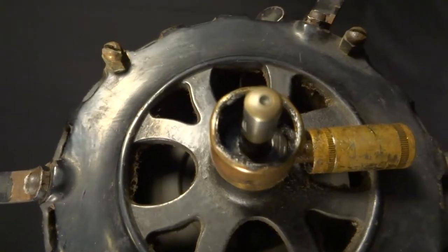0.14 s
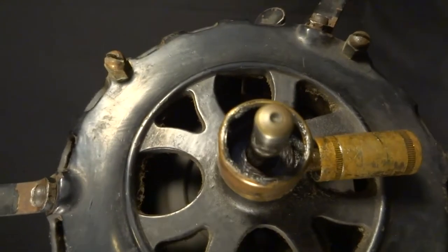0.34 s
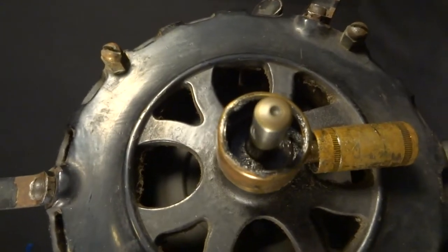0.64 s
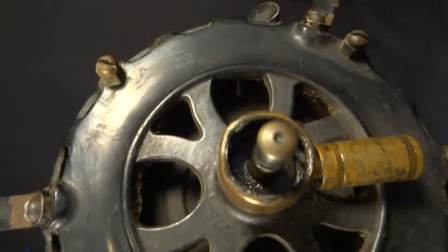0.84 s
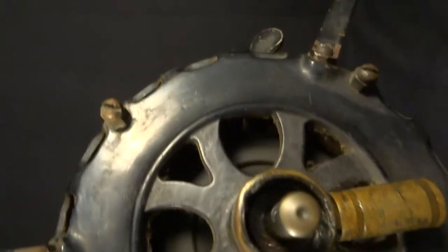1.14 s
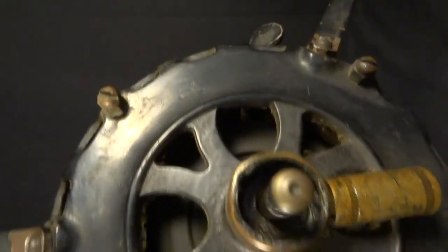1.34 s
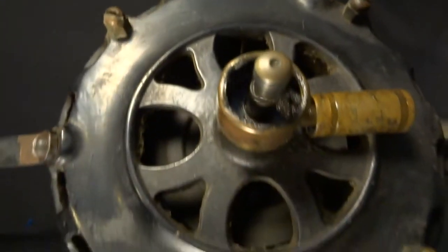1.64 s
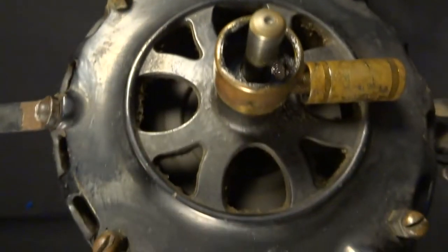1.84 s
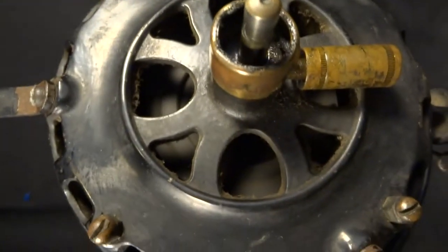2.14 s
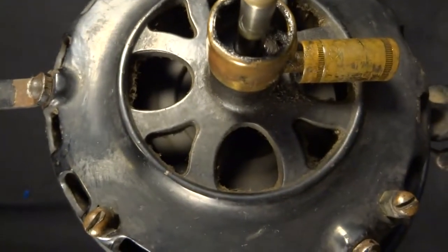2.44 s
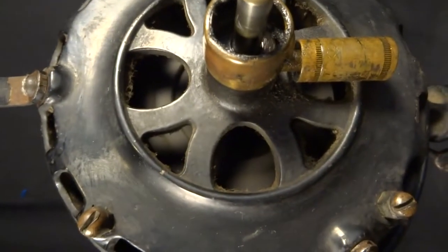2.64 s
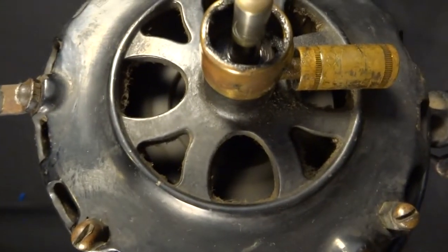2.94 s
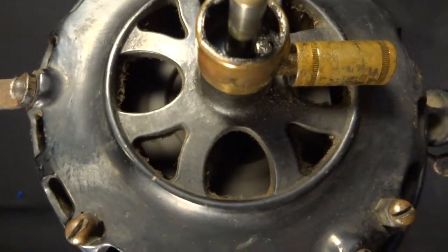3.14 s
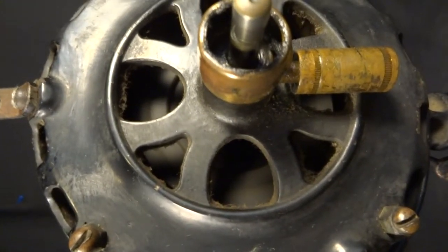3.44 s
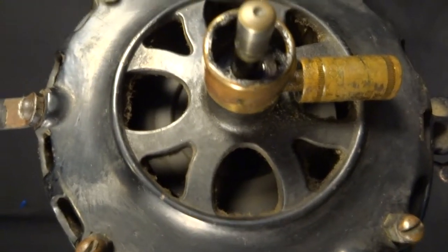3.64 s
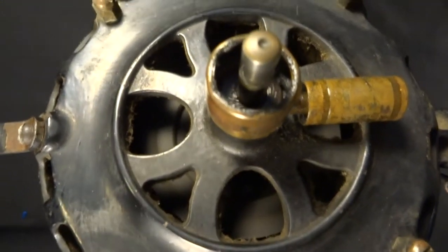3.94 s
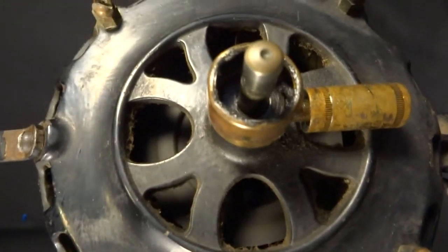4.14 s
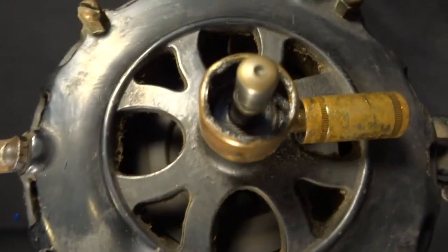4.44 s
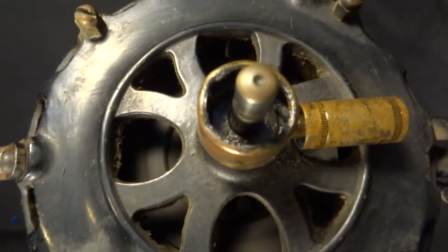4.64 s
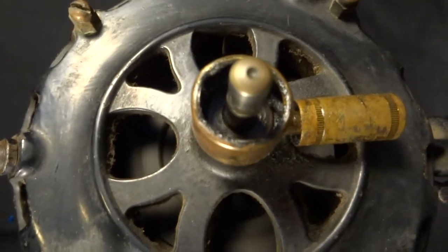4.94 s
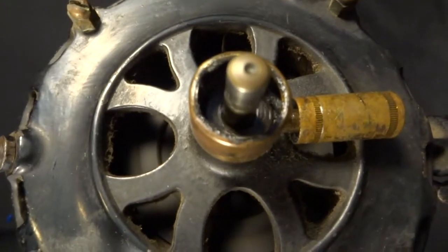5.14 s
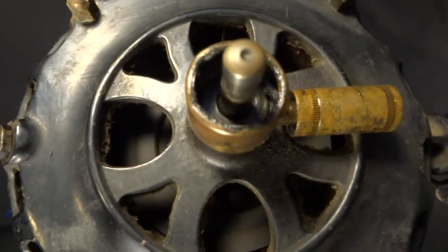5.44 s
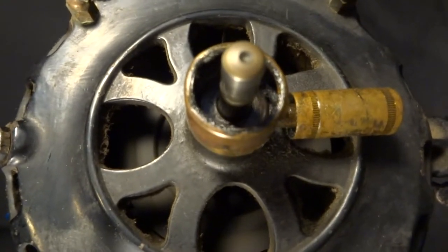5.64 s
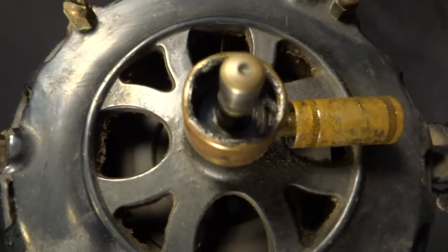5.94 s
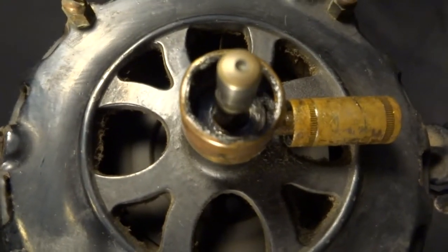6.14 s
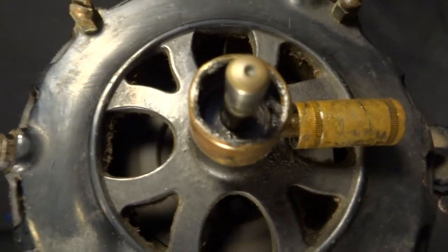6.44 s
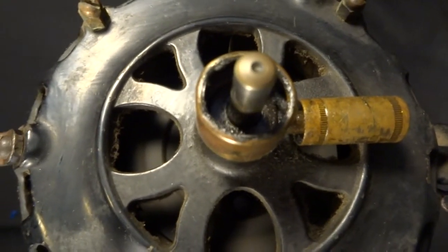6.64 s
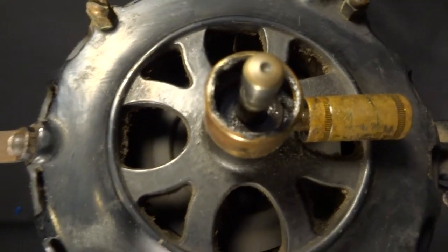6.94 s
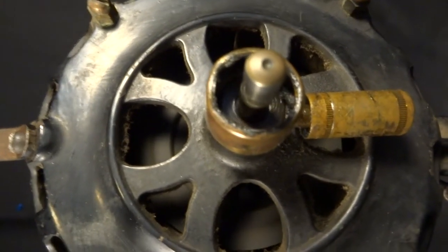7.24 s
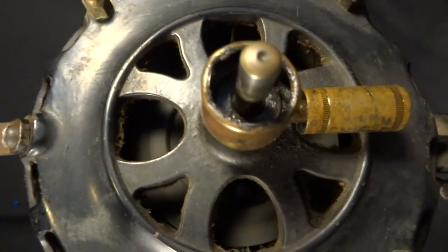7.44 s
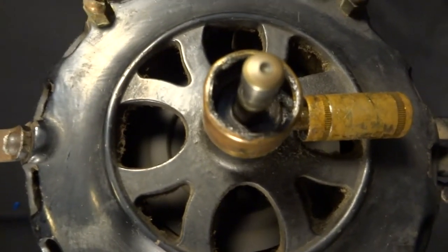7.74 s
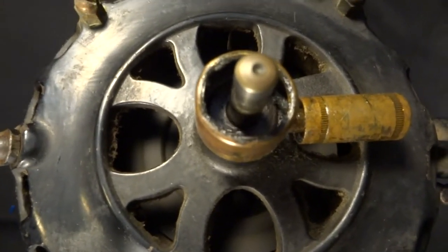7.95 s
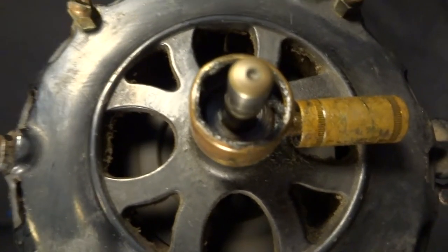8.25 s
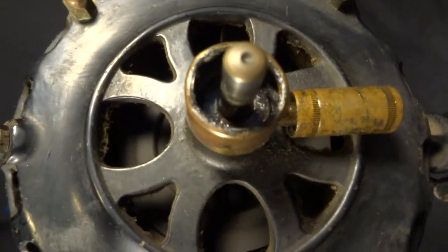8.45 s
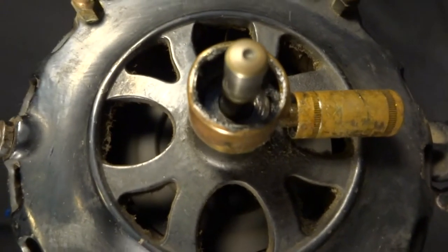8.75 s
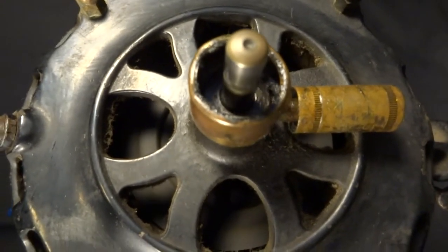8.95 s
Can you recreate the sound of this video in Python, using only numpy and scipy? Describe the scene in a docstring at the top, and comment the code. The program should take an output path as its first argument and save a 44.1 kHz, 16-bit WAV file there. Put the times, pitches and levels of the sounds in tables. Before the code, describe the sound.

An old electric fan hums steadily, then a switch snaps off and the motor starts coasting down.

```python
"""Old fan, switched off

Close stereo microphone on an antique induction fan in a small hard room. The mains pull hums in the
iron, rotor slots whine, the sleeve bearing buzzes, hisses and ticks; something scuffs further off.
A switch snaps, hum and whine die, the motor jolts on its base and the rotor coasts against the air."""
import sys
import numpy as np
from scipy import signal
from scipy.fft import rfft, irfft
from scipy.io import wavfile
from scipy.ndimage import map_coordinates

SR = 44100
rng = np.random.default_rng(int(sys.argv[2]) if len(sys.argv) > 2 else 0)


def wav_out(sig):
    """Save sig, one row per channel (or a flat mono array), as 16-bit PCM at SR to the path in sys.argv[1]."""
    wavfile.write(sys.argv[1], SR, np.round(np.clip(np.atleast_2d(sig).T, -1, 1) * 32767).astype(np.int16))


N = 401745
T = np.arange(N) / SR
SHAFT_HZ, MAINS_HZ, SLOT_COUNT = 27.877, 59.98, 37
OFF_S = 7.975

# sharp resonances of the motor housing: pitch_hz, width_hz, relative_lift_db
HOUSING = [(188, 14, 8), (212, 7.8, 9), (295, 22, 10.5), (433.6, 14.5, 17.5), (534, 14, 20)]


def iron_hum(angle, pull):
    """The field pulls on the iron twice per mains cycle; the turning rotor adds sidebands."""
    # partials: shaft_order, pull_multiple, level_db, left_minus_right_db
    partials = [(-1, 1, -37, 0), (0, 1, -23, 0), (1, 1, -48, -5), (2, 1, -47, 2), (3, 1, -56, -3),
                (-1, 2, -60, -5), (0, 2, -51, 0), (1, 2, -46, -4), (2, 2, -60, -4)]
    return sum(tone(order * angle + multiple * pull, db, pan_db, lead_rad=0.11 * multiple ** 2)
               for order, multiple, db, pan_db in partials)


def slot_whine(angle, pull, off_centre=0.089, flutter_db=0.2):
    """Rotor slots chop the field; the off-centre rotor opens and closes the air gap once a turn."""
    # partials: slot_order, pull_multiple, level_db, left_minus_right_db
    partials = [(1, -1, -58, -2), (1, 0, -59, -8), (1, 1, -44, -2), (1, 2, -67, -1), (2, 0, -50, 2),
                (2, 1, -62, -5), (3, -1, -62, -1), (3, 0, -65, -3), (3, 1, -68, 0), (3, 3, -67, 0),
                (4, -1, -66, 0), (4, 0, -65, -1)]
    beam, whine = beaming(), 0
    for order, multiple, db, pan_db in partials:
        gap = 1 + off_centre * order * np.cos(angle + rng.uniform(0, 2 * np.pi))
        aim = beam ** {1: 0, 2: 1}.get(order, 0.046)  # the second order beams most
        partial = tone(order * SLOT_COUNT * angle + multiple * pull, db, pan_db)
        whine += partial * gap * aim * undb(flutter_db * wander(9))
    return whine


def beaming():
    """The upper whine beams, so its gain swings about the average as the microphone moves."""
    # beam at the microphone: time_s, relative_db
    beam_levels = [(0.0, -49.5), (1.03, -53), (1.14, -58), (1.85, -50), (3.3, -50), (4.97, -57),
                   (7.3, -56.5), (7.9, -58)]
    gain = undb(np.interp(T, *np.transpose(beam_levels)))
    return gain / gain.mean()


def slot_whistle(angle, pace, flutter_db=5):
    """Without current the slots still whistle faintly, wavering as the pitch slides."""
    return tone(2 * SLOT_COUNT * angle, db=-63) * pace ** 4 * undb(flutter_db * wander(18))


def rotor_tones(angle, pace, flutter_db=2.5):
    """Unbalance and four blades make tones that slide through the resonances as the rotor slows."""
    # at full speed: shaft_order, level_db, left_minus_right_db
    partials = [(1, -61, 1), (2, -59, 2), (3, -47, 0), (4, -42, 0), (5, -54, 1), (7, -59, 0), (8, -61, 0),
                (9, -61, 1), (11, -52.5, -2), (15, -54, -2), (18, -59, -2), (19, -52.5, -1), (27, -66, -3)]
    tones = 0
    for order, db, pan_db in partials:
        lift_db = carry_db(order * SHAFT_HZ * pace) - carry_db(order * SHAFT_HZ)
        waver_db = flutter_db * min(order / 8, 1) * wander(5)  # short waves flutter more
        partial = tone(order * angle, db, pan_db, lead_rad=0.03)
        tones += partial * undb(lift_db + waver_db) * pace ** (order / 8)
    return tones


def carry_db(hz, bass_hz=112, bass_db_per_octave=38):
    """Housing and room lift a rotor tone; the small rotor radiates little deep bass."""
    # standing waves of the room: pitch_hz, width_hz, lift_db
    room_modes = [(103.9, 6, 14), (98.15, 2.8, 15)]
    bass_db = bass_db_per_octave * np.minimum(np.log2(hz / bass_hz), 0)
    return resonance_db(hz, HOUSING + room_modes) + bass_db


def air_rush(pace, level_db=-46):
    """The blades stir the air; its long waves reach both sides of the microphone alike."""
    # spectrum of the rush: frequency_hz, relative_db
    spectrum = [(20, -6), (40, -7), (80, 2.5), (200, -1), (300, -3), (450, -2.5), (600, -6.5), (1000, -12),
                (1400, -20.5), (2500, -20), (5000, -39), (15000, -93)]
    side = butter(rng.standard_normal(N), 1, 220, "high")
    air = rng.standard_normal(N) + undb(-2.5) * np.outer([1, -1], side)
    return undb(level_db + wander(6.8)) * colour(air, spectrum) * pace ** 3.2


def bearing_rub(turns, level_db=-51):
    """The shaft rubs in its sleeve and sounds the housing's resonances."""
    # spectrum of the rubbing: frequency_hz, relative_db
    spectrum = [(120, 5.5), (190, -4.5), (260, 1.5), (330, -2), (430, -5), (500, -24.5), (950, -13.5),
                (1300, -23), (1800, -19.5), (2100, -20), (3600, -12), (4100, -33), (8000, -51)]
    rub = undb(level_db) * colour(roughness(turns) + 0.6 * noise(side_db=-9), spectrum)
    housing_db = .5 * resonance_db(np.fft.rfftfreq(N, 1 / SR), HOUSING)
    return irfft(rfft(rub) * undb(housing_db), N)


def bearing_buzz(turns, pull, level_db=-52, loose=0.22, throb=0.57, knock=0.49):
    """The magnetic pull presses the rough shaft home in a buzz that also pulses once a turn."""
    # spectrum of the buzz: frequency_hz, relative_db
    spectrum = [(300, 11), (760, -6.5), (1100, 10.5), (1450, -9.5), (2050, 9), (2500, -6.5), (3100, 7),
                (3600, -0.5), (4100, 2), (4450, -48), (9000, -14.5)]
    pressure = (1 + throb * np.cos(pull)) * (1 + knock * np.cos(2 * np.pi * turns))
    friction = roughness(turns) + loose * noise(side_db=-33)
    return undb(level_db) * colour(friction * pressure, spectrum) * beaming() ** 0.069


def oil_hiss(level_db=-56.5, ramp_s=0.11, flutter_db=0.89):
    """The oil film hisses steadily, and louder in spells when the shaft runs drier."""
    # spectrum of the hiss: frequency_hz, relative_db
    spectrum = [(2000, -3), (3500, -0.5), (5000, 2.5), (6300, -1), (8000, 2), (10000, -0.5), (13000, -1.5),
                (15500, -8.5)]
    # dry spells: start_s, length_s, lift_db
    spells = [(3.926, .53, 3.5), (4.793, 2.46, 4), (8.56, 0.52, 2)]
    dry_db = sum(db * np.clip(.5 + np.minimum(T - start, start + length - T) / ramp_s, 0, 1)
                 for start, length, db in spells)
    return colour(noise(side_db=-39), spectrum) * undb(level_db + dry_db + flutter_db * wander(200))


def oil_crackle(first_per_s=38, thinning_s=6, small_db=-44, spread_db=3, t60=0.0036):
    """Tiny bubbles burst in the oil film: very high specks, thinning out as the motor runs."""
    # the loudest bubbles: start_s, relative_db
    pops = [(1.527, -30), (1.564, -25), (2.98, -26), (5.058, -23)]
    sizes = undb(small_db + spread_db * np.minimum(rng.exponential(size=N), 3))
    bursts = sizes * (rng.random(N) < first_per_s * np.exp(-T / thinning_s) / SR)
    for start, db in pops:
        bursts[int(start * SR)] = undb(db)
    envelope = signal.lfilter([1], [1, -np.exp(-np.log(1000) / (t60 * SR))], bursts + 1e-18)
    return butter(envelope * rng.standard_normal(N), 2, [10000, 14500], "band")


def bearing_ticks(pitch_hz=3370, t60=0.0071, grit=0.37, faint_count=14, settled_s=4.5):
    """The shaft's play clicks in the bearing: a few cycles of ringing and a speck of grit."""
    # the loudest ticks: start_s, relative_db
    loud = [(.1615, -23), (4.1012, -29), (4.170, -28), (4.2055, -20.5), (4.350, -28), (4.7481, -22)]
    faint = zip(rng.uniform(0, settled_s, faint_count), rng.normal(-40.5, 1.5, faint_count))
    clicks, t = np.zeros(N), T[:SR // 50]
    ringing, decay = np.sin(2 * np.pi * pitch_hz * t), np.exp(-np.log(1000) * t / t60)
    for start, db in [*loud, *faint]:
        speck = butter(rng.standard_normal(len(t)), 1, [.8 * pitch_hz, 1.4 * pitch_hz], "band")
        i = int(start * SR)
        clicks[i:i + len(t)] += undb(db) * (ringing + grit * speck / speck.std()) * decay
    return butter(clicks, 3, 2500, "high")


def switch_snap(crack_db=-15, ring_db=5.5, room_db=2):
    """The contacts crack over, the switch rings and the room answers."""
    # contact strikes: delay_s, relative_db
    contacts = [(0, 2), (.0018, -10.5), (.004, -5.5)]
    # spectrum of the crack: frequency_hz, relative_db
    spectrum = [(150, 6.5), (350, 4), (550, 7.5), (750, 1), (1100, -2), (1600, 0), (2600, 0.5), (3400, -3),
                (4500, -5), (5500, 0), (7600, 2), (9000, -6.5), (13000, -5), (15500, -14)]
    # ring of the switch: pitch_hz, relative_db, t60_s
    modes = [(690, -39, .12), (790, -40, .12), (1620, -47, .15), (2490, -45, .1), (4260, -26, .03),
             (4470, -24, .035), (4597, -31, .09), (6410, -49, .55), (6418, -52, .5), (6700, -42, .15),
             (7520, -41, .07), (8310, -48, .3), (9930, -50, .2), (12000, -45, .18), (13280, -45, .22)]
    strikes = sum(undb(db) * fade(OFF_S + delay, t60=0.015) for delay, db in contacts)
    crack = colour(rng.standard_normal(N) * strikes, spectrum)
    snap = undb(crack_db) * crack + undb(ring_db) * ring(modes, OFF_S)
    return snap + undb(room_db) * room(snap, low_t60=0.47, high_t60=0.32, build_s=0.0093)


def base_jolt(start_s=7.99):
    """Freed of its torque, the motor rocks on its base."""
    # rocking modes: pitch_hz, level_db, t60_s
    modes = [(107.9, -9.5, 0.34), (89, -26.5, 0.82)]
    return ring(modes, start_s) * rise(start_s, rise_s=0.019)


def scuffs(grain_db=3.9):
    """Short gritty scrapes some way off, heard through the room."""
    # scrapes: start_s, relative_db
    scrapes = [(.42, -49), (0.883, -23)]
    # spectrum of the grit: frequency_hz, relative_db
    spectrum = [(200, -22), (330, 1.5), (500, 1), (1000, -3.5), (1400, -3), (2500, 0), (5000, -4.5),
                (8000, -10), (13000, -15.5), (15500, -24)]
    strokes = sum(undb(db) * fade(start, t60=0.32) * rise(start, rise_s=0.01) for start, db in scrapes)
    grit = colour(rng.standard_normal(N) * strokes * undb(grain_db * wander(400)), spectrum)
    return room(grit, low_t60=0.61, high_t60=0.35, build_s=0.0011)


def room(x, low_t60, high_t60, build_s, split_hz=1800):
    """Hard walls close by: diffuse reverberation that builds quickly and loses its treble first."""
    low = butter(noise(side_db=-8), 2, split_hz, "low") * fade(0, low_t60)
    high = butter(noise(side_db=-17), 2, split_hz, "high") * fade(0, high_t60)
    tail = ((low + high) * rise(0, build_s))[:, :SR]
    return signal.fftconvolve(x[None], tail / np.sqrt(np.sum(tail ** 2) / 2), axes=1)[:, :N]


def roughness(turns, points=1580):
    """Surface roughness that passes again on every turn of the shaft."""
    return map_coordinates(rng.standard_normal(points), [turns % 1 * points], order=3, mode="grid-wrap")


def tone(phase, db, pan_db=0, lead_rad=0):
    """A stereo sine of the given rms level; the left side is ahead by pan_db and lead_rad."""
    sides = np.array([[.5], [-.5]])
    wave = np.sin(phase + rng.uniform(0, 2 * np.pi) + lead_rad * sides)
    return np.sqrt(2) * undb(db + pan_db * sides) * wave


def ring(modes, start):
    """Decaying modes struck at the start time."""
    return sum(undb(db) * fade(start, t60) * np.sin(2 * np.pi * hz * (T - start))
               for hz, db, t60 in modes)


def resonance_db(hz, peaks):
    """Lift that a set of resonances gives at a frequency."""
    return sum(db / (1 + ((hz - centre) / (width / 2)) ** 2) for centre, width, db in peaks)


def colour(x, spectrum):
    """Shape a signal to a spectrum, rolled off below its lowest point; white noise keeps its power."""
    hz, db = np.transpose(spectrum)
    bins_hz = np.maximum(np.fft.rfftfreq(N, 1 / SR), 1)
    gain = undb(np.interp(np.log(bins_hz), np.log(hz), db))
    gain /= np.sqrt(1 + (.5 * hz[0] / bins_hz) ** 4)
    return irfft(rfft(x) * gain / np.sqrt(np.mean(gain ** 2)), N)


def butter(x, order, hz, kind):
    """Low, high or band pass."""
    return signal.sosfilt(signal.butter(order, hz, kind, fs=SR, output="sos"), x)


def noise(side_db):
    """Stereo white noise with a side part of the given level."""
    mid, side = rng.standard_normal((2, N))
    return mid + undb(side_db) * np.outer([1, -1], side)


def wander(rate_hz):
    """Smooth random drift, spread near 1."""
    return np.interp(T * rate_hz, np.arange(2000), rng.standard_normal(2000))


def rise(start, rise_s):
    """Silence, then a rounded climb to 1."""
    return 1 - np.exp(-np.maximum(T - start, 0) / rise_s)


def fade(start, t60):
    """Silence, then an exponential decay."""
    return (T >= start) * np.exp(-np.log(1000) * np.maximum(T - start, 0) / t60)


def undb(db):
    """Decibels to gain."""
    return 10 ** (np.asarray(db) / 20)


def scene(drag_per_s=.213):
    """Steady running, then a coast in which air drag grows with the square of the speed."""
    pace = 1 / (1 + drag_per_s * np.maximum(T - OFF_S, 0))  # share of full speed
    turns = np.cumsum(SHAFT_HZ * pace) / SR
    angle = 2 * np.pi * turns
    pull = 2 * np.pi * 2 * MAINS_HZ * T  # phase of the magnetic pull
    current = (T < OFF_S) + fade(OFF_S, t60=0.17)
    iron = current * (iron_hum(angle, pull) + slot_whine(angle, pull))
    rotor = (1 - current) * slot_whistle(angle, pace) + rotor_tones(angle, pace) + air_rush(pace)
    bearing = bearing_rub(turns) + current * bearing_buzz(turns, pull)
    oil = oil_hiss() + oil_crackle()
    return iron + rotor + bearing + oil + bearing_ticks() + scuffs() + switch_snap() + base_jolt()


def record(dry, top_hz=15700):
    """The recorder cuts the top."""
    return signal.sosfilt(signal.ellip(10, .2, 80, top_hz, fs=SR, output="sos"), dry)


dry = scene()
out = record(dry)
wav_out(out)
```